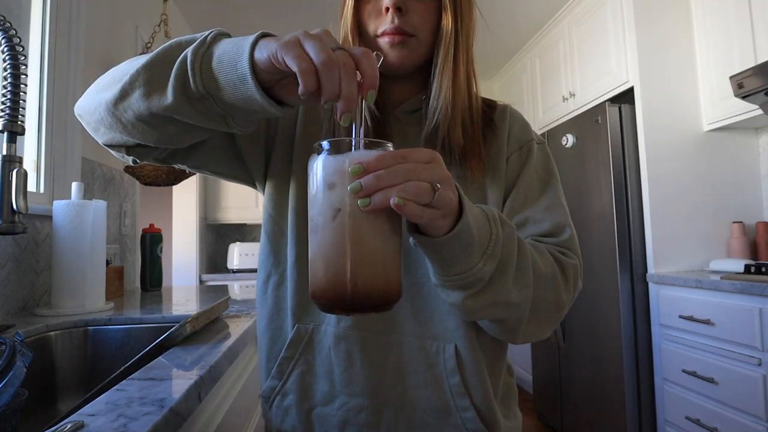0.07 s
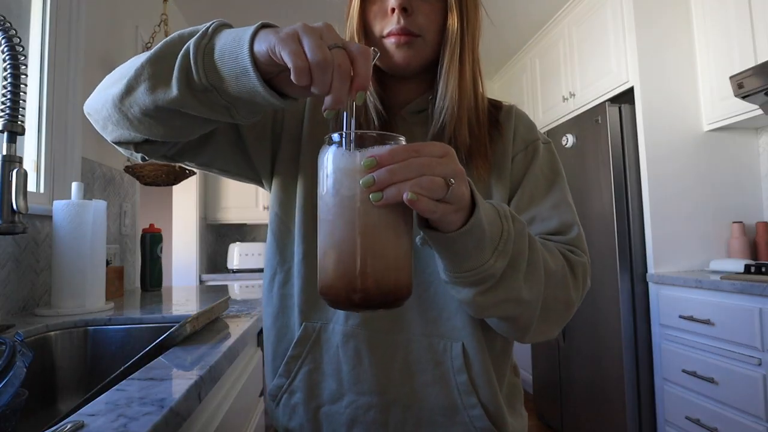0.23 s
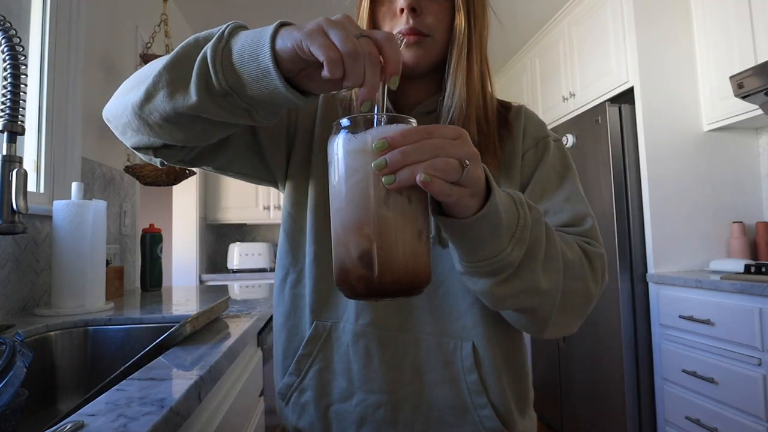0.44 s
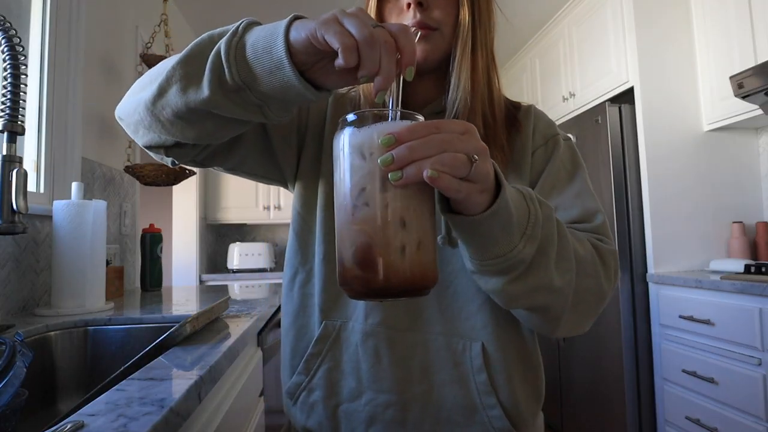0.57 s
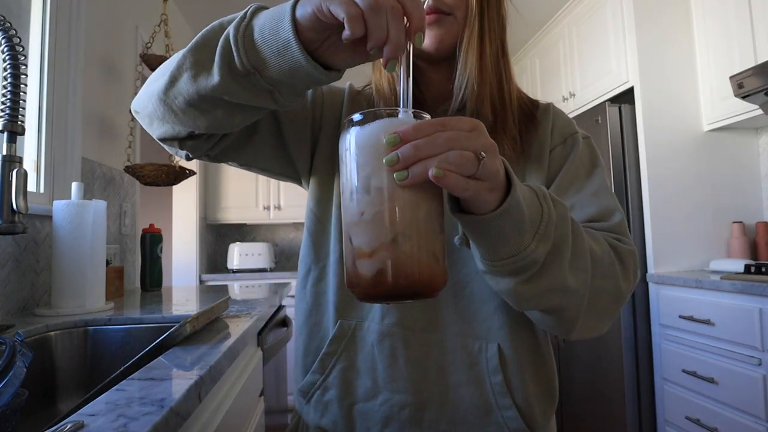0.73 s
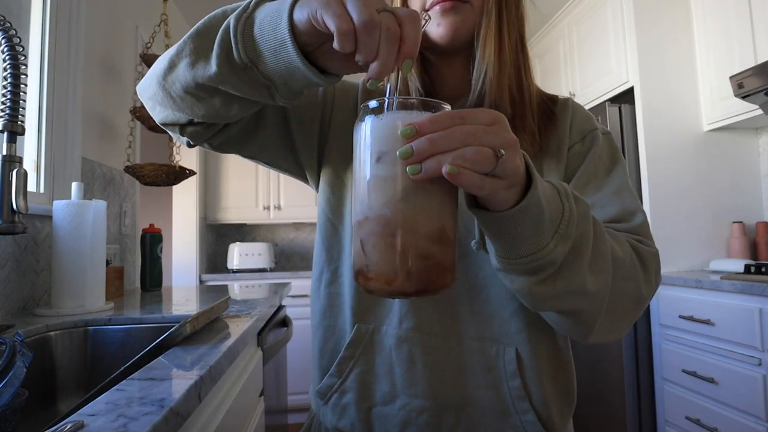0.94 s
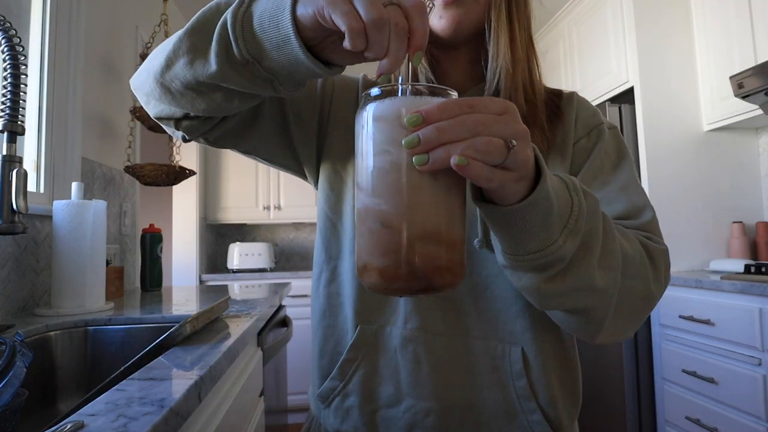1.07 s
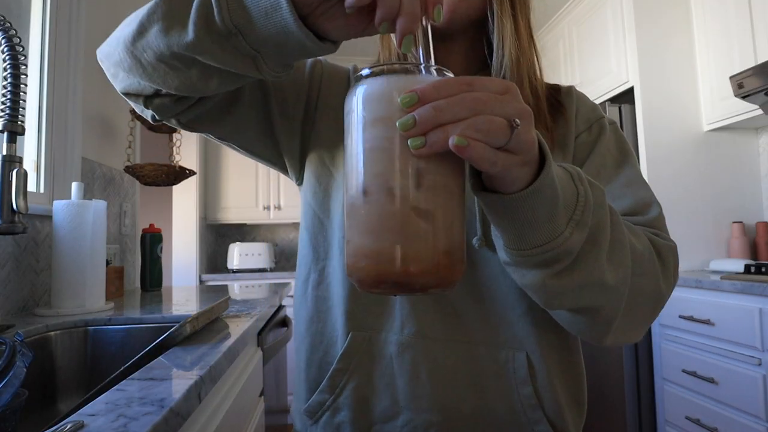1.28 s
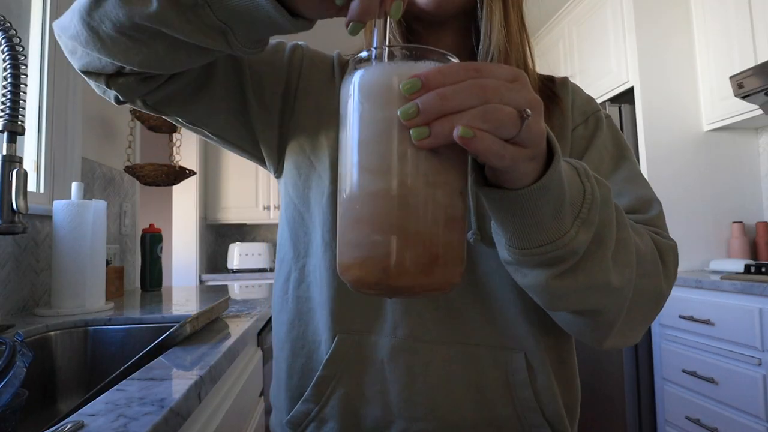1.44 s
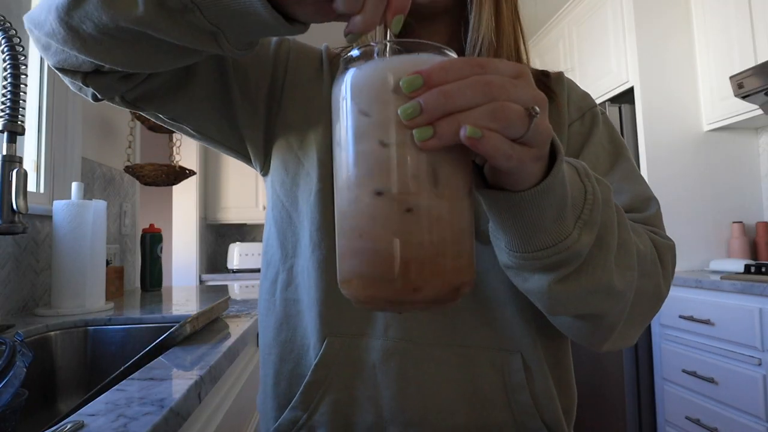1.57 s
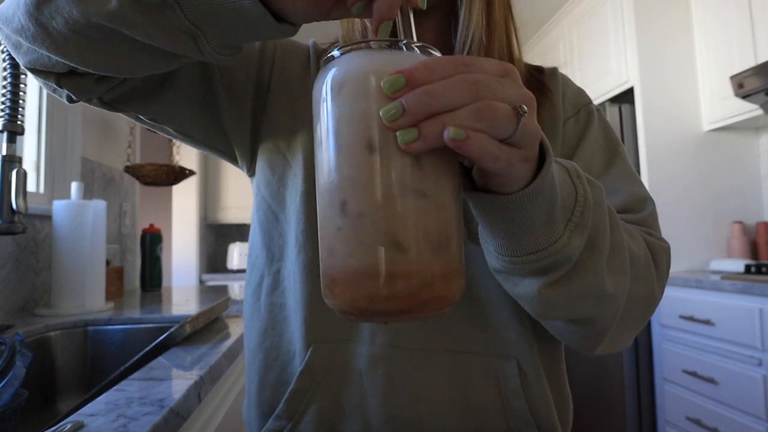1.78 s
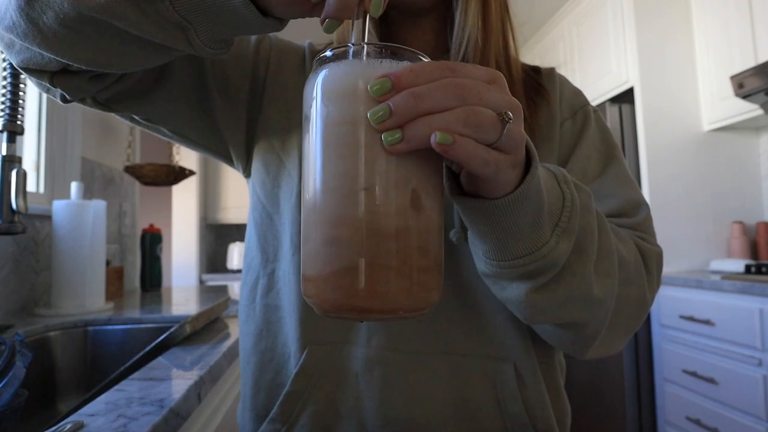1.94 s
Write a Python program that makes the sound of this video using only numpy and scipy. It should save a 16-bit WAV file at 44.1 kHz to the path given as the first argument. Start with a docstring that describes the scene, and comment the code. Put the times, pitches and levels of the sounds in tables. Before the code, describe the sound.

A metal straw stirs an iced drink in a glass, with irregular bright clinks and ice ticks

```python
"""In a kitchen, close to the microphone, a metal straw stirs an iced drink in a hand-held glass.
The straw excites the damped modes of the glass wall and rings thinly as narrow bands of noise.
Ice cubes tick as noise snaps with short tones, over a crackle of grains and a softly churning liquid.
Bubbles plip as decaying tones that rise in pitch; echoes and a diffuse tail make the hard room answer,
and steady shaped noise is its background."""
import sys
import numpy as np
from scipy import signal
from scipy.fft import rfft, irfft
from scipy.io import wavfile

SR = 44100
rng = np.random.default_rng(int(sys.argv[2]) if len(sys.argv) > 2 else 0)


def int16_out(signal):
    """Quantize to a 16-bit WAV file."""
    q = np.round(np.clip(np.atleast_2d(signal).T, -1, 1) * 32767)
    wavfile.write(sys.argv[1], SR, q.astype(np.int16))


N = 88508
SIZE = 4096  # samples in a short sound and in a filter
FREQS = np.fft.rfftfreq(SIZE, 1 / SR)
T = np.arange(SIZE) / SR

# Radiation spectrum of ice contacts: frequency_hz, gain_db
ICE_SPECTRUM = [(100, -37), (250, -15.5), (470, -12.5), (650, -5.5), (1000, -2.5), (1500, 2), (2200, -1),
                (3100, -1.5), (5600, -5.5), (8800, -10), (10800, -18), (12800, -17.5), (16000, -18)]


def amp(db):
    """Decibel law: a level in dB becomes an amplitude ratio."""
    return 10 ** (np.asarray(db) / 20)


def unit(x):
    """Energy normalisation: the sum of squares becomes one."""
    return x / np.sqrt(np.sum(x ** 2) + 1e-20)


def read(points, hz):
    """Spectral interpolation: reads a curve on a logarithmic frequency axis."""
    f, value = np.transpose(points)
    return np.interp(np.log(hz + 1), np.log(f + 1), value)


def fade(t, t60):
    """Exponential damping: the amplitude falls by 60 dB in t60 seconds."""
    return np.exp(-np.log(1000) * t / t60)


def add(mix, s, sound):
    """Superposition: adds a sound to the mix, starting at s seconds."""
    part = mix[max(round(s * SR), 0):][:len(sound)]
    part += sound[:len(part)]


def colour(x, curve_db):
    """Minimum-phase filtering: the gain at FREQS fixes the phase through the Hilbert transform."""
    log_gain = np.log(amp(np.r_[curve_db, curve_db[-2:0:-1]]))
    spectrum = np.exp(np.conj(signal.hilbert(log_gain)))
    taps = np.fft.ifft(spectrum).real
    return signal.fftconvolve(x, taps)[:len(x)]


def voiced(x, centres, levels_db, span):
    """Band-energy balance: filters a hit to given band levels, its energy averaged over span seconds."""
    centres = np.array(centres, float)
    edges = np.sqrt(centres[1:] * centres[:-1])
    band = np.searchsorted(edges, FREQS)
    power = abs(rfft(x, SIZE)) ** 2 / (SIZE * span * SR / 2)
    gains = np.zeros(len(centres))
    # The smooth curve couples neighbouring bands, so the gains are refined in steps
    for _ in range(4):
        curve = read(np.c_[centres, gains], FREQS)
        band_power = np.bincount(band, power * amp(curve) ** 2)
        gains = gains + levels_db - 10 * np.log10(band_power + 1e-20)
    return colour(x, read(np.c_[centres, gains], FREQS))


def noise(spectrum):
    """Stationary random sound: Gaussian noise of rms one with the given spectrum."""
    gain = amp(read(spectrum, np.fft.rfftfreq(N, 1 / SR)))
    shaped = rfft(rng.standard_normal(N)) * gain
    return np.sqrt(N) * unit(irfft(shaped, N))


def clicks(per_s):
    """Random arrivals: impulses at a mean rate, most of them small."""
    spread_db = 3.5
    strength_db = spread_db * np.minimum(rng.exponential(1, N), 3)
    return (rng.random(N) < per_s / SR) * amp(strength_db)


def air():
    """Ambient noise: a stationary random field makes the quiet steady background of the room."""
    # Background spectrum: frequency_hz, relative_level_db (per Hz)
    air_spectrum = [(20, -8.5), (45, -15), (100, -5.5), (130, 0), (180, -6.5), (290, 5.5), (500, -6),
                    (650, 0), (1400, -3), (4000, -28), (16000, -23)]
    level_db = -54
    return amp(level_db) * noise(air_spectrum)


def kitchen(x):
    """Room response: early echoes from hand and counter join a tail with frequency-dependent decay."""
    # Near surfaces: delay_s, level_db
    echoes = [(.0027, -15), (.0046, -14.5), (.0074, -17.5), (.0098, -20)]
    # Reverberation time: frequency_hz, t60_s
    room_t60 = [(150, 1), (800, 0.34), (2000, 0.33), (5500, 0.57), (9000, 0.33), (15000, 0.19)]
    # Spectrum of the tail: frequency_hz, gain_db
    room_colour = [(100, -20), (500, -12), (1300, -7.5), (3000, -10), (5600, -15.5), (9000, -15.5),
                   (15000, -19.5)]
    build_s, echo_t60_s = 0.0028, 0.0077

    _, t, diffuse = signal.stft(rng.standard_normal(SR * 3 // 4), SR, nperseg=256)
    hz = np.fft.rfftfreq(256, 1 / SR)
    t60 = read(room_t60, hz)[:, None]
    # Division by the root of t60 evens out the energy across frequency
    tail = signal.istft(diffuse * fade(t, t60) / np.sqrt(t60), SR, nperseg=256)[1]
    tail_t = np.arange(len(tail)) / SR
    build_up = 1 - np.exp(-(tail_t / build_s) ** 2)
    response = colour(unit(tail * build_up), read(room_colour, FREQS))
    for delay_s, level_db in echoes:
        echo = unit(rng.standard_normal(SIZE) * fade(T, echo_t60_s))
        add(response, delay_s, amp(level_db) * echo)
    return x + signal.fftconvolve(x, response)[:N]


def jostle(count=36, cycles=9, low_hz=650, high_hz=7000, tilt_db=-3):
    """Granular sound: many tiny ice contacts, each a few cycles long, over the churning liquid."""
    # Common level of crackle, snaps and slosh: time_s, gain_db
    jostle_level = [(0, -41), (.06, -40), (0.109, -49), (.25, -45.5), (.36, -41.5), (.45, -38), (.53, -41),
                    (.6, -49.5), (.77, -54.5), (.9, -37), (.98, -45.5), (1.12, -40.5), (1.251, -42.5),
                    (1.35, -48.5), (1.499, -43), (1.7, -51), (1.8, -44.5), (1.95, -44.5)]
    # Spectrum of the churning liquid: frequency_hz, relative_level_db (per Hz)
    slosh_spectrum = [(100, -33), (300, -5.5), (600, 2), (950, -11.5), (1400, 3), (2200, -7), (3300, -12.5),
                      (5500, -27), (9000, -13), (16000, -52)]
    grains_per_s, grain_noise_t60_s = 650, 0.0038
    snaps_per_s, snap_db, snap_t60_s = 110, 11.5, 0.0017  # tiny cracks in the ice
    slosh_db = -7  # relative to the crackle

    grains = np.zeros(N)
    for hz in np.geomspace(low_hz, high_hz, count):
        train = clicks(grains_per_s / count)
        tone = unit(np.sin(2 * np.pi * hz * T) * fade(T, cycles / hz))
        hiss = unit(rng.standard_normal(SIZE) * fade(T, grain_noise_t60_s))
        tilt = amp(tilt_db * np.log(hz / low_hz))
        grains += tilt * signal.oaconvolve(train, tone + 0.53 * hiss)[:N]
    crackle = unit(colour(grains, read(ICE_SPECTRUM, FREQS))) * np.sqrt(N)

    snap_envelope = signal.oaconvolve(clicks(snaps_per_s), unit(fade(T, snap_t60_s)))[:N]
    snaps = amp(snap_db) * snap_envelope * noise(ICE_SPECTRUM)
    slosh = amp(slosh_db) * noise(slosh_spectrum)
    level = amp(np.interp(np.arange(N) / SR, *np.transpose(jostle_level)))
    return (crackle + snaps + slosh) * level


def bubbles():
    """Bubble resonance: trapped air rings as a damped oscillator, rising in pitch."""
    # Bubbles in the drink: start_s, initial_pitch_hz, level_db, t60_s
    bubble_events = [(0.9687, 1350, -5.5, 0.0056), (1.243, 245.6, -41, 0.2), (1.27, 152, -45, 0.21),
                     (1.278, 259.4, -43.5, 0.18), (1.316, 137.8, -45, 0.2), (1.407, 286, -38, 0.097),
                     (1.412, 755, -37, 0.055), (1.4305, 1080, -26, .025), (1.4444, 1080, -13, 0.023),
                     (1.464, 1180, -25, .04), (1.4853, 330, -33.5, 0.057), (1.909, 1014, -30, 0.068),
                     (1.942, 1058, -30.5, 0.076)]
    rise_per_s, attack_cycles = 1.18, 1.17  # pitch rise as a fraction of the initial pitch

    out = np.zeros(N)
    for s, hz, db, t60 in bubble_events:
        turns = hz * (T + rise_per_s * T ** 2 / 2)
        attack = 1 - np.exp(-T * hz / attack_cycles)
        add(out, s, amp(db) * attack * fade(T, t60) * np.sin(2 * np.pi * turns))
    return out


def ice_ticks():
    """Impact of solids: a broadband snap excites the short knock of a cube and one loose overtone."""
    # Ice against ice, straw and wall, levels before the common gain:
    # start_s, pitch_hz, body_db, click_db, treble_db
    tick_events = [(0.0468, 1025, -28.5, -33.5, -39.5), (0.1352, 990, -26, -37.5, -43),
                   (0.1763, 1250, -34, -32.5, -37.5), (0.1859, 1510, -30.5, -27.5, -33),
                   (0.2009, 1180, -24, -26, -28), (0.2485, 1290, -31.5, -32.5, -50),
                   (0.2715, 1230, -35.5, -37, -41), (0.299, 1300, -27, -34, -49),
                   (0.305, 1270, -35, -34, -48), (0.4205, 1500, -28.5, -38, -33.5),
                   (0.4293, 1430, -30.5, -23.5, -30.5), (0.4368, 1420, -26, -23.5, -44),
                   (0.462, 1340, -30.5, -30.5, -39), (0.4828, 1180, -37, -23, -31),
                   (0.4933, 1270, -29, -50, -42), (0.5044, 670, -28.5, -35, -55),
                   (0.5266, 1190, -47, -35, -41.5), (0.541, 710, -28, -44, -48),
                   (0.6252, 1530, -32.5, -35.5, -73), (0.636, 1700, -45, -38.5, -46.5),
                   (0.7308, 1340, -46, -40.5, -47), (0.758, 1390, -36, -44.5, -68),
                   (0.7955, 1000, -38, -40, -50), (0.8231, 2080, -37, -35.5, -45.5),
                   (0.848, 1300, -26.5, -29.5, -36), (0.854, 1530, -38, -32, -53),
                   (0.8782, 1490, -36, -33, -56), (0.886, 2150, -53, -44, -38),
                   (0.8885, 1760, -18, -19, -37), (0.8903, 1700, -35, -43, -30.5),
                   (0.8931, 1550, -23, -30.5, -32), (0.8962, 1900, -24, -28.5, -36),
                   (0.899, 2170, -27, -22.5, -44), (0.9017, 2030, -22.5, -32, -36),
                   (0.906, 1600, -32, -31, -39), (0.9249, 2080, -34.5, -27.5, -31),
                   (1.004, 2050, -32, -33.5, -41), (1.096, 920, -21.5, -42, -40),
                   (1.1144, 1350, -28.5, -36, -39), (1.1523, 1150, -29, -35.5, -46),
                   (1.1653, 1270, -26.5, -36, -53), (1.2142, 1110, -32.5, -30.5, -44),
                   (1.3726, 2130, -41, -38, -45.5), (1.4135, 820, -35.5, -33.5, -48),
                   (1.4481, 1140, -26.5, -27, -38), (1.561, 960, -30.5, -32, -42.5),
                   (1.6168, 1010, -36, -58, -66), (1.6874, 1800, -30, -35, -48),
                   (1.7071, 2260, -41, -38.5, -46.5), (1.7591, 1770, -33.5, -26.5, -37),
                   (1.8538, 1420, -36.5, -31, -44), (1.8888, 830, -32.5, -43, -42),
                   (1.9111, 1050, -34, -35, -40), (1.9417, 1080, -35, -33.5, -43),
                   (1.9571, 1890, -26, -31, -50)]
    # Centres of the body, click and treble bands: frequency_hz
    tick_bands = [1400, 3500, 8500]
    snap_t60_s, cube_t60_s = 0.0089, 0.011
    cube_db, overtone_db = -12, -4  # cube against snap, overtone against fundamental
    overtone_ratio, span_s, gain_db = 2.106, 0.0062, -3.5  # ratio before its random spread

    out = np.zeros(N)
    for s, hz, *levels in tick_events:
        upper_hz = hz * overtone_ratio * rng.uniform(0.81, 1.27)
        fundamental = np.sin(2 * np.pi * hz * T)
        overtone = amp(overtone_db) * np.sin(2 * np.pi * upper_hz * T)
        cube = (fundamental + overtone) * fade(T, cube_t60_s)
        snap = rng.standard_normal(SIZE) * fade(T, snap_t60_s)
        tick = colour(unit(snap) + amp(cube_db) * unit(cube), read(ICE_SPECTRUM, FREQS))
        add(out, s, amp(gain_db) * voiced(tick, tick_bands, np.array(levels), span_s))
    return out


def straw():
    """Free vibration: the steel tube rings on when it swings free, blurred by the room into narrow bands."""
    # Free rings of the straw: start_s, level_db (added to each band's level)
    ring_events = [(0.0, -30.5), (0.3794, -35.5), (1.0451, -27.5), (1.484, -40.5), (1.835, -46)]
    # Ringing bands: centre_hz, width_hz, level_db, t60_s
    ring_bands = [(3000, 910, -7.5, 0.33), (5450, 660, -4.5, 0.46), (12660, 780, -17, 0.17)]

    out, t = np.zeros(N), np.arange(SR // 2) / SR
    f = np.fft.rfftfreq(len(t), 1 / SR)
    for s, level in ring_events:
        for hz, width, db, t60 in ring_bands:
            resonance = 1 / (1 + (2 * (f - hz) / width) ** 2)
            band = irfft(rfft(rng.standard_normal(len(t))) * resonance, len(t))
            add(out, s, amp(level + db) * np.sqrt(len(t)) * unit(band) * fade(t, t60))
    return out


def clinks(level_db=-1.05, scrape=0.94):
    """Modal excitation: the straw scrapes the wall and rebounds; damped modes of glass and straw ring."""
    # Straw against glass, band levels before the common gain: start_s, straw_pitch_hz (before scatter),
    # ring_length_ratio, rebound_delay_s, rebound_db, thud_db, then one level_db per clink band
    clink_events = [(0.2132, 5870, 0.36, 0.00077, -13, -36.5, -28, -20, -24.5, -21.5, -13, -21, -23),
                    (0.3802, 5440, 0.9, .00055, -2.5, -71, -32.5, -34.5, -29.5, -28, -16, -29, -33.5),
                    (1.0437, 6070, 0.58, 0.00053, 10, -46, -22, -19, -17.5, -17, -22.5, -22.5, -25.5),
                    (1.0701, 5060, 0.62, 0.00069, -3, -58, -20.5, -24.5, -16, -27, -24.5, -23, -27),
                    (1.4849, 5300, 1.15, .0032, -11.5, -66, -21, -23, -19, -20.5, -23.5, -23.5, -30.5),
                    (1.8361, 4930, 0.75, .0014, -14, -66, -30.5, -23.5, -23, -31.5, -25.5, -35, -32),
                    (1.9956, 5440, .9, .0027, -3.5, -70, -22, -26, -23, -26.5, -25, -25, -34)]
    # Centres of the clink bands: frequency_hz
    clink_bands = [750, 1600, 3000, 4200, 5500, 8400, 13000]
    # Modes of the filled, hand-damped glass, before scatter and length ratio: frequency_hz, level_db, t60_s
    glass_modes = [(713, 0, 0.024), (839, 0.5, 0.021), (1316, -3, 0.022), (1585, -4.5, 0.021),
                   (2034, -5, 0.015), (2715, 0, 0.033), (3066, -1, 0.026), (4130, -1, 0.02),
                   (4560, 8.5, 0.0058), (7970, -13.5, 0.0039), (8510, 7.5, 0.0039), (12440, 8, 0.0053)]
    # Colour of the scrape: frequency_hz, gain_db
    contact_colour = [(450, -12), (850, 0.5), (5800, -1), (6800, -4.5), (9000, -4), (10600, -15.5),
                      (12700, -14.5), (15000, -18.5)]
    knock_db, knock_t60_s = 5, 0.012  # the straw's own mode, before scatter and length ratio
    pitch_scatter, mode_scatter_db = 0.0033, 3.7  # standard deviations, pitch as a fraction
    contact_s, contact_t60_s, contact_db = 0.0012, 0.027, -2.5  # t60 before length ratio
    rise_s, thud_s, span_s = 0.00014, 0.00025, 0.008
    scatter_db, scatter_t60_s = -13, 0.11  # dense reflections from the counter and cupboards

    out = np.zeros(N)
    low_cut = signal.butter(4, 570, "high", fs=SR, output="sos")
    contact_curve = read(contact_colour, FREQS)
    for s, straw_hz, length, rebound_s, rebound_db, thud_db, *levels in clink_events:
        levels = np.array(levels)
        ring = np.zeros(SIZE)
        for hz, db, t60 in [*glass_modes, (straw_hz, knock_db, knock_t60_s)]:
            level_chance, pitch_chance, phase = rng.standard_normal(3)
            mode_hz = hz * (1 + pitch_scatter * pitch_chance)
            mode_amp = amp(db + mode_scatter_db * level_chance)
            ring += mode_amp * fade(T, t60 * length) * np.sin(2 * np.pi * (mode_hz * T + phase))

        contact_envelope = np.exp(-(T / contact_s) ** 2) + scrape * fade(T, contact_t60_s * length)
        contact = colour(rng.standard_normal(SIZE) * contact_envelope, contact_curve)
        blow = unit(ring) + amp(contact_db) * unit(contact)
        blow *= 1 - np.exp(-T / rise_s)
        hit = blow.copy()
        add(hit, rebound_s, amp(rebound_db) * blow)
        hit = signal.sosfilt(low_cut, hit)
        add(out, s, amp(level_db) * voiced(hit, clink_bands, levels, span_s))

        scatter = colour(rng.standard_normal(SIZE) * fade(T, scatter_t60_s), contact_curve)
        scatter = signal.sosfilt(low_cut, scatter)
        add(out, s, amp(scatter_db) * voiced(scatter, clink_bands, levels, span_s))

        thud = unit(T * np.exp(-T / thud_s))
        add(out, s, amp(thud_db) * np.sqrt(0.0055 * SR) * thud)
    return out


def scene():
    """Superposition: the room answers the stirred glass, and its steady background is added."""
    drink = jostle() + bubbles() + ice_ticks() + straw() + clinks()
    return (kitchen(drink) + air())[None]


def record(dry):
    """Transducer limits: the microphone dulls the very top, peaks beyond full scale clip, the band ends."""
    # Microphone response: frequency_hz, gain_db
    microphone = [(13500, 0), (16000, -5)]
    edge_hz = 16100
    clipped = np.clip(colour(dry[0], read(microphone, FREQS)), -1, 1)[None]
    band_limit = signal.firwin(255, edge_hz, window=("kaiser", 9), fs=SR)
    return signal.oaconvolve(clipped, band_limit[None], "same")


dry = scene()
out = record(dry)
int16_out(out)
```